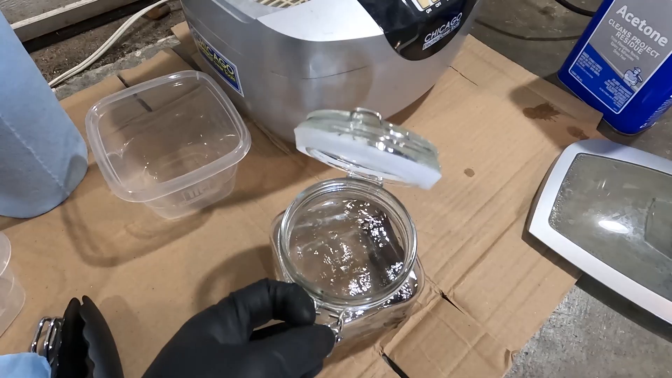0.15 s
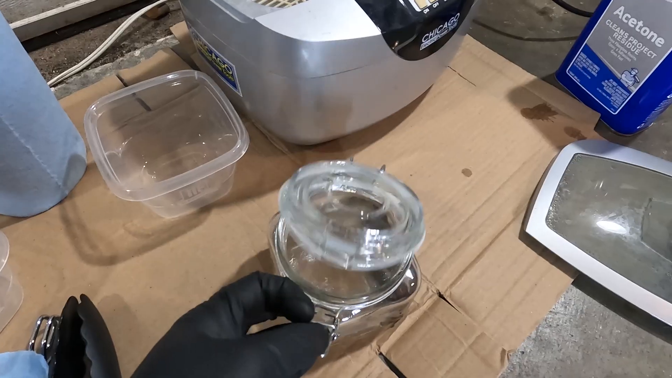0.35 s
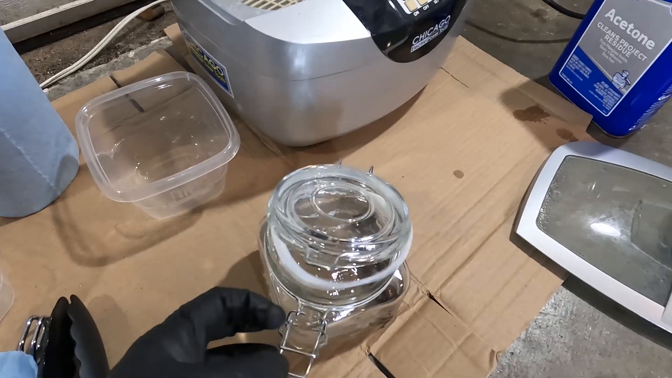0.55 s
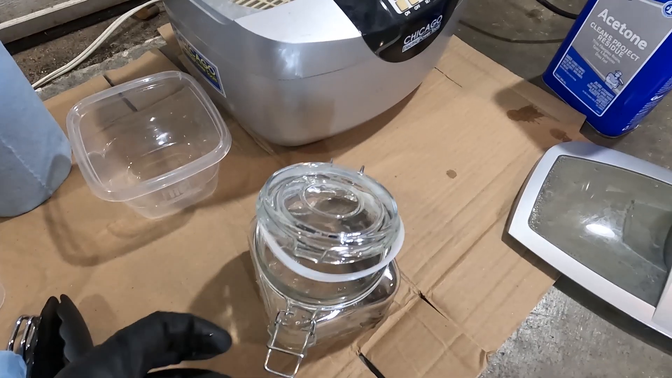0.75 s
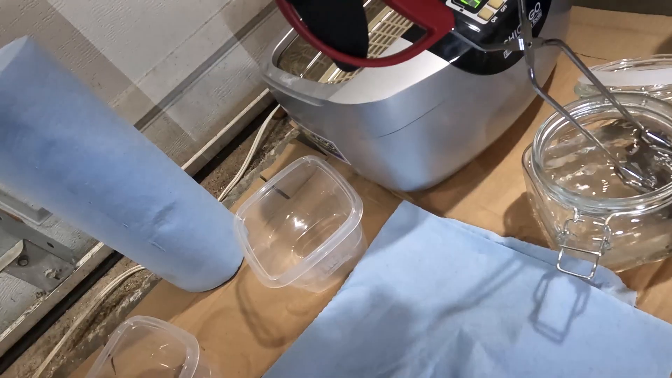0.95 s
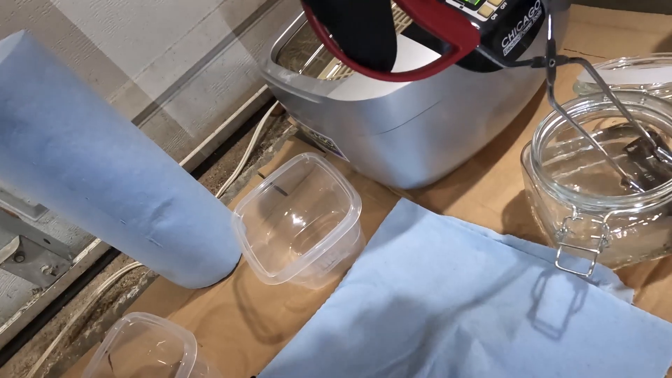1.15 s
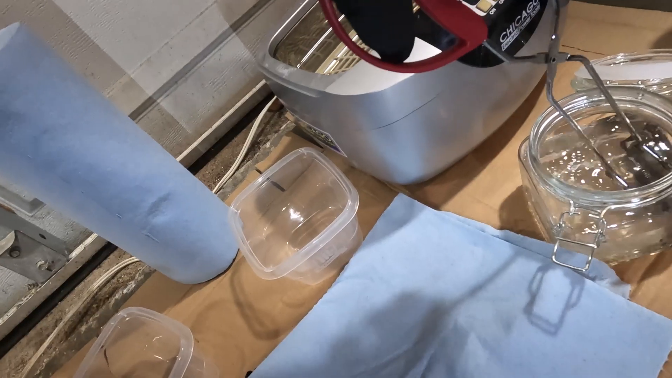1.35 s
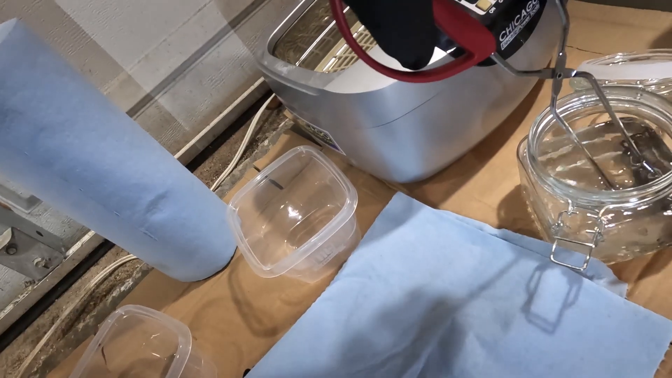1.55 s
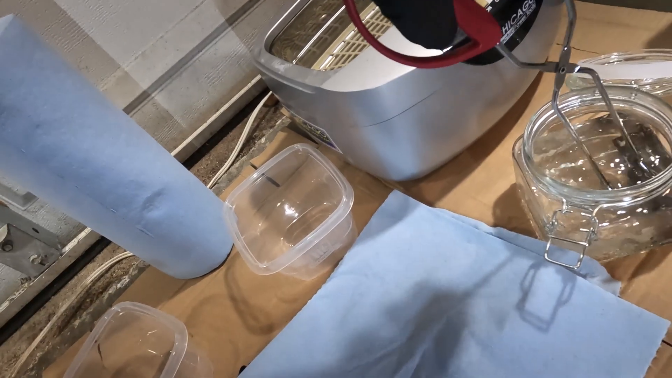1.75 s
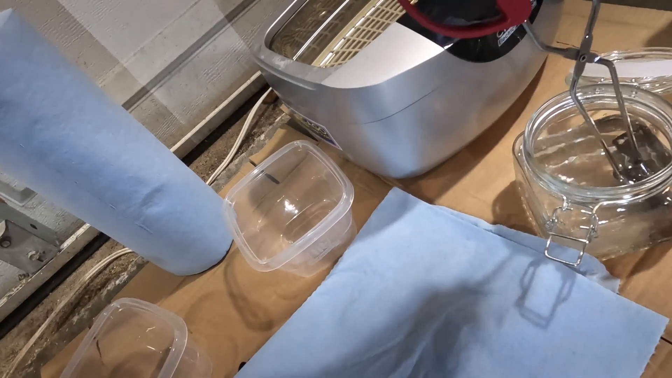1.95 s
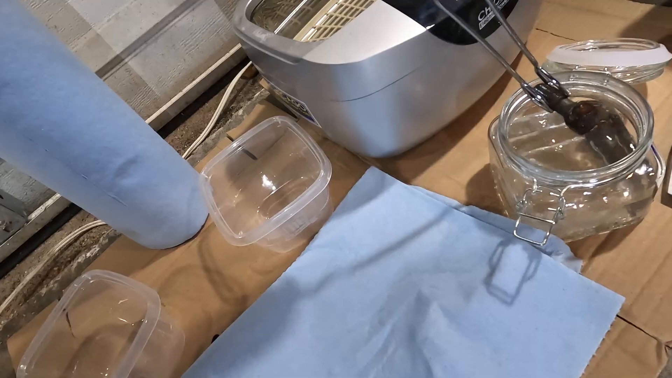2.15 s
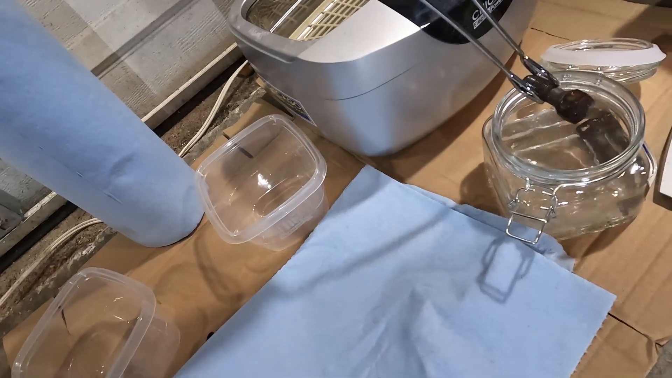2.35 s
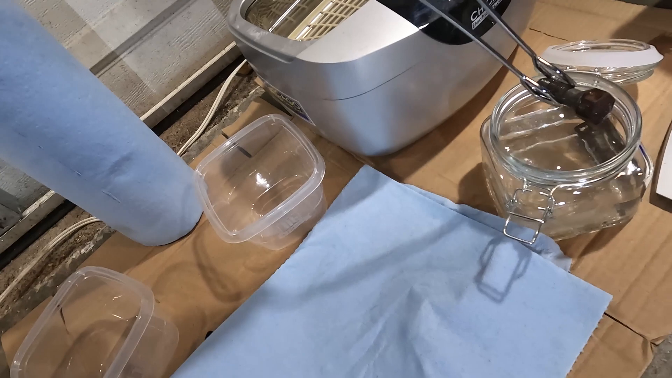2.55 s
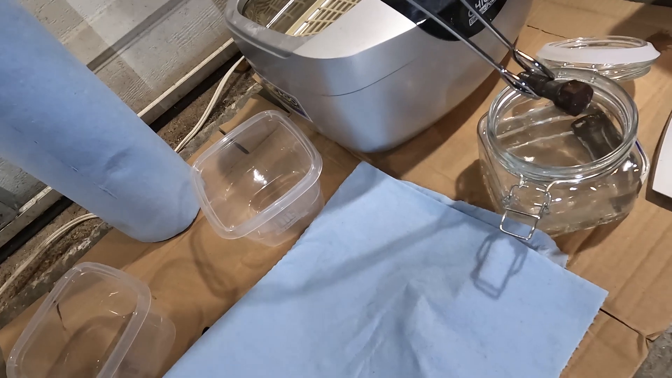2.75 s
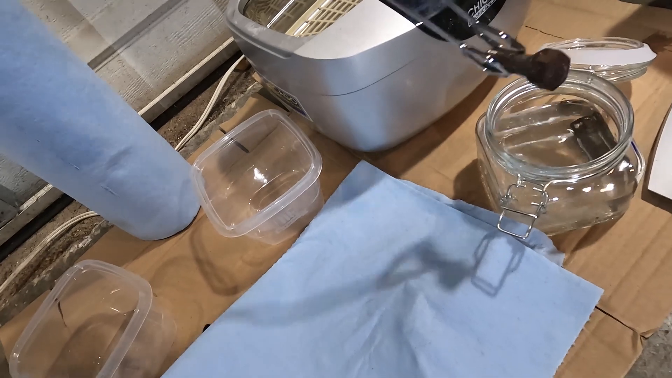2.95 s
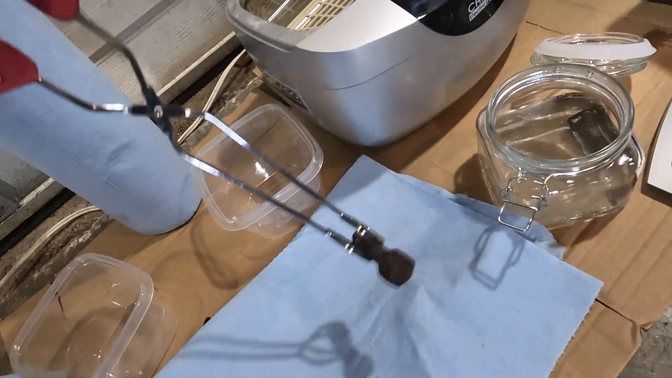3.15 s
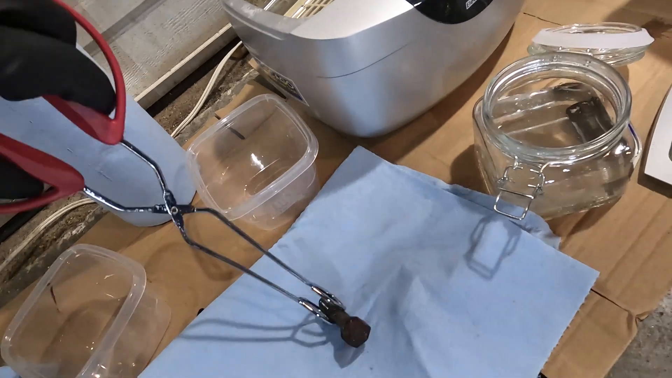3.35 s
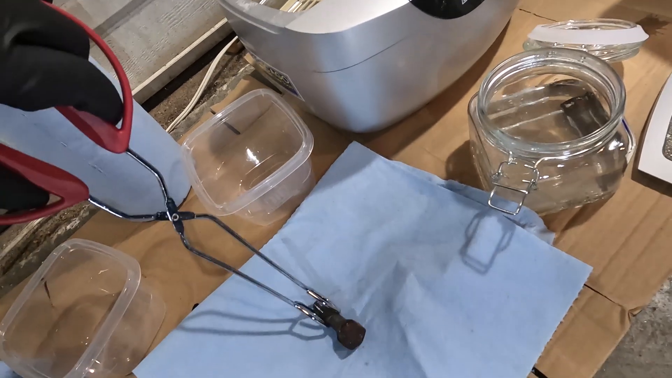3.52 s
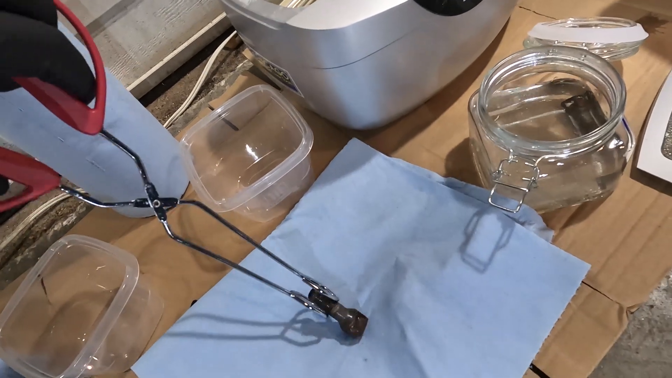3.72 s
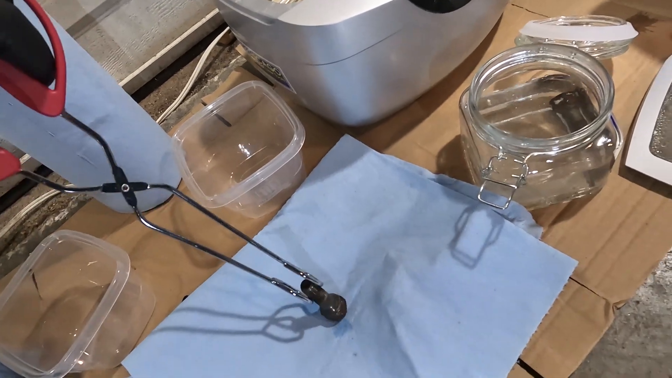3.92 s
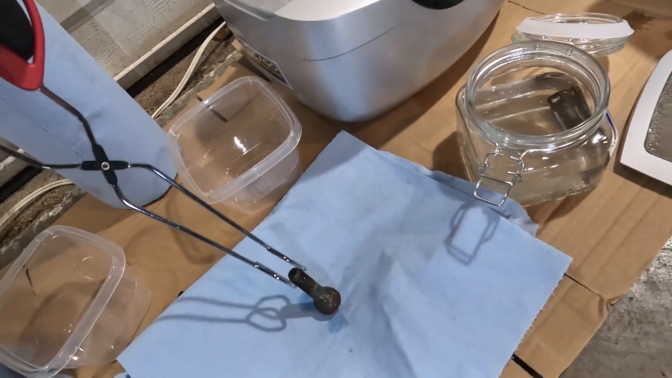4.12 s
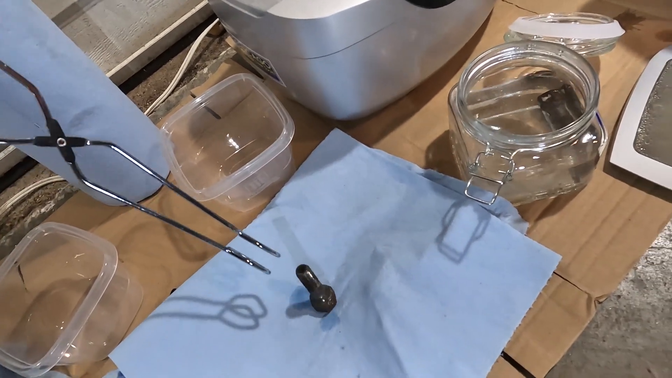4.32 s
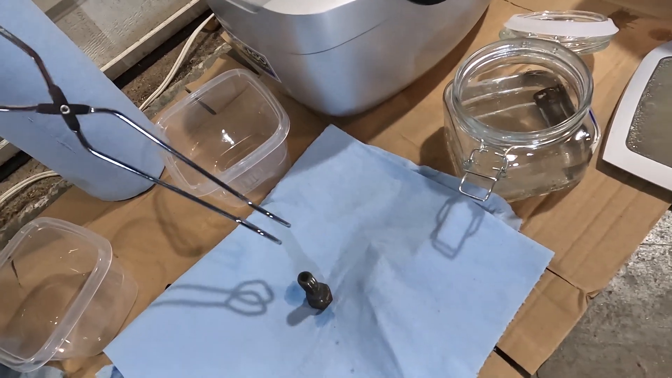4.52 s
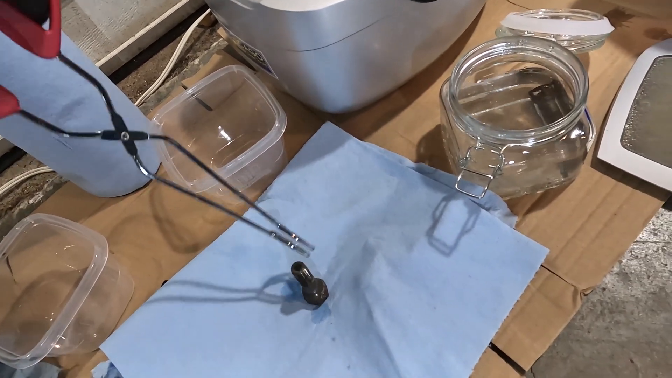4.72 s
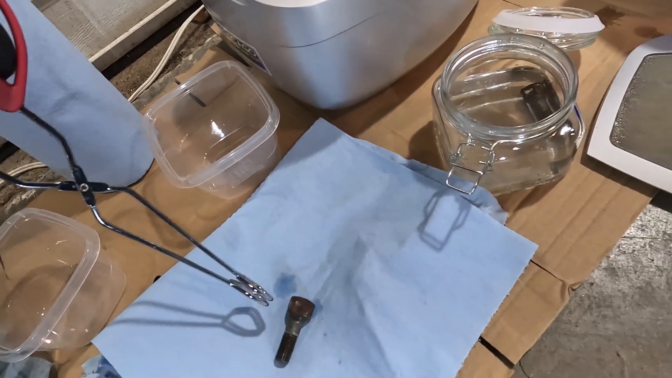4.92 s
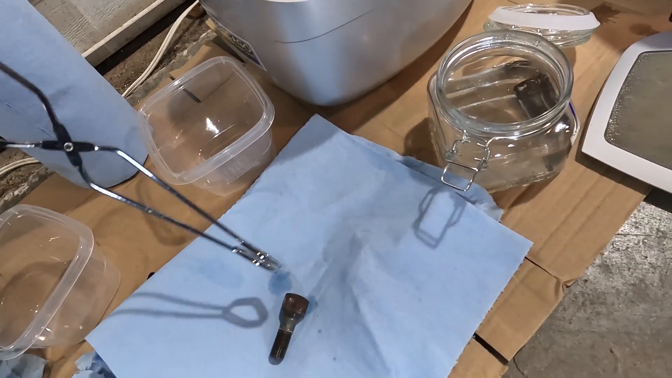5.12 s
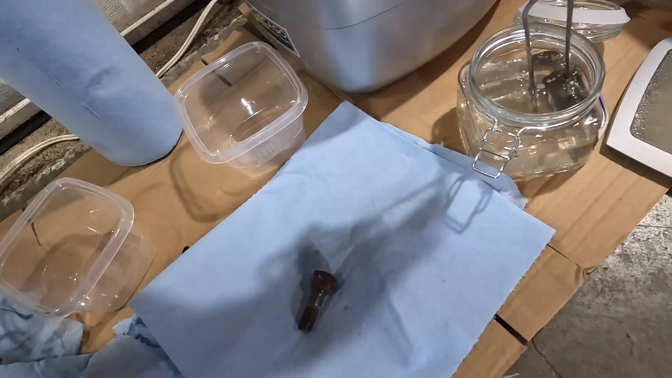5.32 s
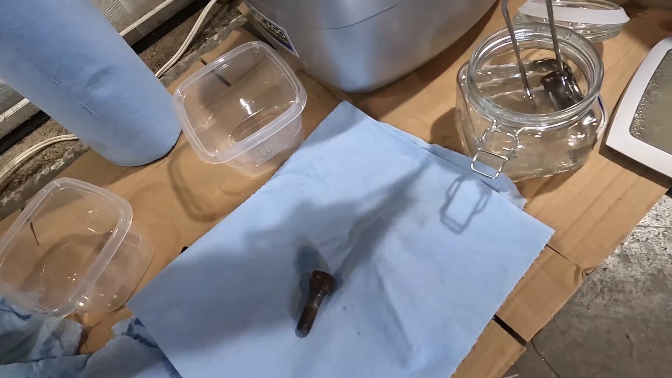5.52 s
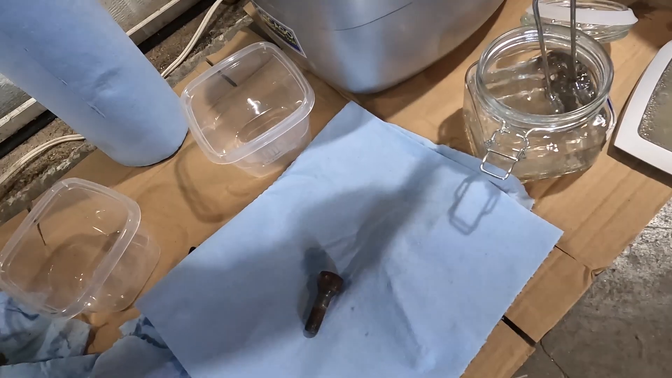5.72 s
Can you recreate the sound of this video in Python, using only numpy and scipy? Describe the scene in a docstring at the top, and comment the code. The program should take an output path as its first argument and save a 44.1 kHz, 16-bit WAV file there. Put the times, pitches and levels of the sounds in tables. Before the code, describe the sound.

A small workshop with soft bassy air noise, a steady low mains hum and faint handling rumble, heard through a close hand-held stereo microphone, slightly heavier on the right. At about 0.2 s a clip-top jar springs open: a dull bench thump, short wire twang, scrape and glass clunks, with another lid tap at 0.3 s. Light ticks and a faint hinge scrape lead to a lid clink near 0.66 s. Steel tongs tap the glass from 0.87 to 1.25 s, bright and ringing; bolts clink at 1.7 and 2.0 s, and a purer, beating rim ring sounds at 2.3 s. Then mostly hum until a faint rasp from 3.6 s, with small dry steel clicks around 3.9-4.3 s. Sharp jaw clicks come at 4.9 s and a firm bench bump at 5.1 s. From 5.4 s to the end, tongs and bolts rattle rapidly in the jar with gritty skids.

```python
"""Glass jar and steel tongs on a bench

A clip-top glass jar is popped open on a cardboard-covered bench; steel tongs fish in it, knock on the
glass and lift out a bolt. The jaws scrape off the bolt over a paper towel and click shut, something bumps
the bench, and the tongs rummage in the jar again. Blows are sums of decaying modes with bursts of noise,
scrapes are trains of stick-slip clicks; a small workshop with a mains hum surrounds a hand-held microphone."""
import sys
import numpy as np
from scipy import signal
from scipy.fft import rfft, irfft
from scipy.io import wavfile
from scipy.ndimage import uniform_filter1d

SR = 44100
rng = np.random.default_rng(int(sys.argv[2]) if len(sys.argv) > 2 else 0)


def int16_out(signal):
    """Quantize to a 16-bit WAV file."""
    q = np.round(np.clip(np.atleast_2d(signal).T, -1, 1) * 32767)
    wavfile.write(sys.argv[1], SR, q.astype(np.int16))


N = 254898
TIME = np.arange(N) / SR
AGE = TIME[:SR // 2]  # seconds since a blow


def amp(db):
    """Logarithmic level: decibels to amplitude gain."""
    return 10 ** (np.asarray(db) / 20)


def level(x, db):
    """Mean power: scale the whole signal to an rms level."""
    return x * amp(db) / np.std(x)


def attack(x, db):
    """Onset power: scale a blow by the rms level of its first 25 ms."""
    return x * amp(db) / np.std(x[:SR // 40])


def fade(t60):
    """Exponential damping: a loss of 60 dB in t60 seconds."""
    return np.exp(-np.log(1000) * AGE / max(t60, 1e-3))


def band(x, lo_hz, hi_hz, order=3):
    """Band limitation: a causal Butterworth band-pass."""
    sos = signal.butter(order, [lo_hz, min(hi_hz, SR / 2 - 1)], "band", fs=SR, output="sos")
    return signal.sosfilt(sos, x + 1e-18)


def noise(t60):
    """Broadband excitation: a burst of decaying white noise."""
    return rng.standard_normal(len(AGE)) * fade(t60)


def add(track, start_s, x):
    """Superposition: mix x into the track at its start time."""
    i = max(int(start_s * SR), 0)
    track[i:i + len(x)] += x[:max(N - i, 0)]


def through(x, response):
    """Linear response: convolve x with an impulse response of unit energy."""
    return signal.fftconvolve(x, response / np.linalg.norm(response))[:N]


def ring(modes, t60_at_4khz, scatter_db, detune, damping=0.41):
    """Modal superposition: high modes die sooner; contact spot and grip vary their levels and pitches."""
    out = np.zeros(len(AGE))
    for mode_hz, mode_db in modes:
        level_chance, pitch_chance, sign_chance = rng.standard_normal(3)
        gain = np.sign(sign_chance) * amp(mode_db + scatter_db * level_chance)
        decay = fade(t60_at_4khz * (4000 / mode_hz) ** damping)
        out += gain * decay * np.sin(2 * np.pi * mode_hz * (1 + detune * pitch_chance) * AGE)
    return out


# spectrum of the workshop air, before its overall level is set: pitch_hz, density_db (dB per Hz)
AIR_SPECTRUM = [(30, -3), (100, -6), (200, -18), (400, -37), (750, -42.5), (1300, -40), (2500, -54),
                (4500, -57.5), (7000, -53.5), (13000, -66.5)]


def workshop_air(air_db=-40.5):
    """Diffuse-field noise: shaped noise whose two ports agree in the bass and differ higher up."""
    freq = np.fft.rfftfreq(N, 1 / SR) + 1e-3
    hz, db = np.transpose(AIR_SPECTRUM)
    shape = amp(np.interp(np.log(freq), np.log(hz), db))
    mid, side = rfft(rng.standard_normal((2, N))) * shape
    side = side * np.clip(freq / 2500, .08, .8)
    return level(irfft(np.array([mid + side, mid - side]), N), air_db)


def mains_hum(hum_hz=119.5, hum_db=-45):
    """Modulated tone: a sine whose phase and level waver together at 1 to 1.5 Hz."""
    waver = level(band(rng.standard_normal(N), 1.0, 1.5, order=1), 0)
    tone = np.sin(2 * np.pi * hum_hz * TIME + 0.1 * waver)
    return level(tone * amp(0.5 * waver), hum_db)


# rumble of the hand on the microphone, interpolated between the rows: time_s, level_db
HAND_RUMBLE = [(0, -39), (3.0, -44.5), (3.4, -37), (4.4, -34), (5.78, -36)]


def hand_rumble():
    """Structure-borne sound: very low noise follows the movements of the hand."""
    rumble = level(band(rng.standard_normal(N), 26, 27, order=2), 0)
    return rumble * amp(np.interp(TIME, *np.transpose(HAND_RUMBLE)))


def workshop():
    """Background superposition: air noise, mains hum and the rumble of the hand."""
    return workshop_air() + mains_hum() + hand_rumble()


def room(x, early_db=-10, tail_db=-12, t60_low=0.25, t60_high=0.26):
    """Reverberation: bench reflections reach both ports alike, the diffuse tail differs between them."""
    sparse = rng.random(len(AGE)) < .03
    near = through(x, noise(0.11) * (AGE > .002) * sparse)
    tails = []
    for _ in range(2):
        low = band(noise(t60_low), 130, 5500, order=2)
        high = band(noise(t60_high), 5000, 9000, order=1)
        tails.append(through(x, (low + amp(-2.5) * high) * (AGE > .008)))
    return x + amp(early_db) * near + amp(tail_db) * np.array(tails)


# dull blows on the bench: start_s, level_db, thud_db (re level)
BENCH_BUMPS = [(0.176, -29.5, 14), (0.186, -31, 8), (0.226, -31.5, -0.5), (0.513, -41, 1.5),
               (0.56, -39, -6), (3.757, -55.5, 9.5), (5.077, -25.5, 2.5), (5.104, -27.5, -8)]
SLAP_PER_DB, FIRM_BUMP_DB = 0.5, -28  # a bump softer than a firm one loses its slap faster than its knock


def bumps(knock_db=-3, slap_db=-2):
    """Impact on a damped plate: the bench thuds and its cardboard cover knocks and slaps."""
    out = np.zeros(N)
    for start_s, level_db, thud_db in BENCH_BUMPS:
        boards = np.zeros(len(AGE))
        for hz, t60 in [(88, 0.054), (118, 0.061), (150, .07), (250, 0.043)]:
            boards += fade(t60) * np.sin(2 * np.pi * hz * AGE)
        thud = attack(boards, thud_db)
        knock = attack(band(noise(.13), 170, 650, order=2), knock_db)
        firmness_db = SLAP_PER_DB * (level_db - FIRM_BUMP_DB)
        slap = attack(band(noise(.12), 900, 3500, order=2), slap_db + firmness_db)
        add(out, start_s, amp(level_db) * (thud + knock + slap))
    return out


# twangs of the lid's wire clasp: start_s, pitch_hz, level_db, t60_s
CLASP_TWANGS = [(.186, 595.8, -14, 0.24), (.226, 702, -44.5, 2)]


def clasp():
    """Free vibration: the released wire clasp rings like a small spring."""
    out = np.zeros(N)
    for start_s, pitch_hz, level_db, t60_s in CLASP_TWANGS:
        add(out, start_s, amp(level_db) * fade(t60_s) * np.sin(2 * np.pi * pitch_hz * AGE))
    return out


SWELL_DB_PER_S, RELEASE_DB_PER_S = 66.5, 300  # the pressure builds through a stroke, then lets go


def pressure(strokes):
    """Sliding contact: each stroke catches at once, swells to its end and dies away."""
    gain = np.zeros(N)
    for start_s, end_s, level_db in strokes:
        swell_db = SWELL_DB_PER_S * np.maximum(end_s - TIME, 0)
        release_db = RELEASE_DB_PER_S * np.maximum(TIME - end_s, 0)
        gain += (TIME > start_s) * amp(level_db - swell_db - release_db)
    return gain


def slips(strokes, per_s, spread_db):
    """Stick-slip friction: random tiny clicks, set to unit power, follow the pressure of the strokes."""
    happens = rng.random(N) < per_s / SR
    strength = amp(spread_db * np.clip(rng.standard_normal(N), -2, 2))
    clicks = happens * strength * rng.choice([-1, 1], N)
    return level(clicks, 0) * pressure(strokes)


def rasp(strokes, response, hiss_db):
    """Friction-driven resonance: slips ring a body, and each sheds a moment of hiss."""
    clicks = slips(strokes, 1200, 4)
    envelope = np.sqrt(np.abs(uniform_filter1d(clicks ** 2, size=130)))
    hiss = envelope * rng.standard_normal(N)
    hiss = band(band(hiss, 1100, 11000, order=1), 900, 13500, order=5)
    return through(clicks, response) + amp(hiss_db) * hiss


# ringing modes of the jar's glass and of the steel on it: pitch_hz, level_db (relative)
GLASS_MODES = [(1660, -11.5), (2790, -10), (3232, -5), (3740, -3), (4185, -9.5), (4285, -5.5), (4812, -4.5),
               (5445, -1.5), (6040, -8.5), (6225, 1.5), (6570, -0.5), (7025, -1.5), (7510, -12.5),
               (10350, -2), (10500, -1), (13660, -15)]
STEEL_MODES = [(1725, -7), (2260, 0), (3450, -6), (4490, -5.5), (4900, -3), (5860, 8), (7750, 0.5),
               (8450, -5), (8750, -11), (9290, -5.5), (9640, -1)]
GLASS_T60_S, STEEL_T60_S = 0.12, 0.063  # at 4 kHz


def jar_response():
    """Modal response: the jar's glass with weaker steel, as each slip excites them."""
    return ring(GLASS_MODES, GLASS_T60_S, 0, 0) + amp(-4.0) * ring(STEEL_MODES, STEEL_T60_S, 0, 0)


# strokes of the lid grinding in its hinge: start_s, end_s, level_db (at the end, relative)
LID_STROKES = [(.185, .205, -20.5), (.5, .6, -46)]


def lid_scrape(lid_db=-3):
    """Stick-slip friction: the lid grinds in its wire hinge and excites the jar."""
    return amp(lid_db) * rasp(LID_STROKES, band(jar_response(), 2100, 4600, order=2), 1)


# strokes of the tongs round the jar: start_s, end_s, level_db (at the end, relative)
RUMMAGE_STROKES = [(5.52, 5.55, -32), (5.645, 5.78, -19)]


def rummage(rummage_db=-3):
    """Stick-slip friction: the tongs skid round the jar and excite it."""
    return amp(rummage_db) * rasp(RUMMAGE_STROKES, band(jar_response(), 1650, 5700, order=2), -5.5)


# ringing modes of the tongs' jaws: pitch_hz, level_db (relative)
JAW_MODES = [(3170, -2), (3970, -4.5), (5040, 4.5), (5350, -8.5), (5520, 4), (6260, 1.5), (6920, 4.5),
             (7900, 5), (8270, -7.5), (9300, -4), (10760, -11)]
JAWS_T60_S = .035  # at 4 kHz
# strokes of the jaws along the bolt's thread: start_s, end_s, level_db (at the end, relative)
BOLT_STROKES = [(3.6, 3.98, -40.5), (4.23, 4.29, -33)]


def bolt_scrape(bolt_db=-7):
    """Damped resonance: the jaws rasp along the bolt's thread while the grip halves their ringing."""
    return amp(bolt_db) * rasp(BOLT_STROKES, ring(JAW_MODES, JAWS_T60_S / 2, 0, 0), 8.9)


# small clicks of steel: start_s, level_db, pitch_hz (strongest partial)
STEEL_TICKS = [(0.4602, -42.5, 6500), (0.503, -47, 5920), (0.5936, -40, 4830), (0.608, -43.5, 3300),
               (2.01, -36, 6500), (2.155, -51.5, 3000), (3.926, -33.5, 6200), (3.954, -35, 5440),
               (3.9639, -32, 4700), (4.006, -34, 5500), (4.184, -45, 4980), (4.2174, -38.5, 4300),
               (4.2547, -35, 5100), (4.2677, -29.5, 6830), (4.2951, -33.5, 3170), (4.906, -31, 8400),
               (4.9316, -29, 8600), (4.9742, -45, 5180), (5.079, -33.5, 3220), (5.1055, -27.5, 7000)]


def ticks(low_db=-6.0, high_db=-2, crack_db=13, favoured_db=9):
    """Heavily damped impact: the gripped jaws give short, dry, bright clicks."""
    out = np.zeros(N)
    for start_s, level_db, pitch_hz in STEEL_TICKS:
        jaws = ring(JAW_MODES + [(pitch_hz, favoured_db)], JAWS_T60_S, 2, .012)
        blow = jaws + amp(crack_db) * noise(.012) + amp(-3) * noise(.05)
        low = attack(band(blow, 1220, 5240), low_db)
        high = attack(band(blow, 5100, 12500, order=4), high_db)
        add(out, start_s, amp(level_db) * (low + high))
    return out


REBOUND_S, REBOUND_DB = .004, -5  # typical gap before the springy steel touches again; loss per rebound


def chatter(x, count=2):
    """Repeated impact: a blow followed by its quick, ever weaker rebounds."""
    delays = np.cumsum(REBOUND_S * rng.uniform(.4, 1.6, count))
    out = x
    for k, delay_s in enumerate(delays):
        out = out + amp(REBOUND_DB * (k + 1.5)) * np.pad(x, (int(delay_s * SR), 0))[:len(x)]
    return out


RIM_HZ, RIM_SPLIT_HZ, RIM_T60_S = 2074, 5, .3
RIM_LOAD = .003  # largest share by which the touching steel detunes the rim note


def rim_note(twin_db=-8):
    """Split degenerate mode: the mouth flexes into an oval and, being not quite round, beats."""
    hz = RIM_HZ * (1 + RIM_LOAD * rng.uniform(-1, 1))
    twin = np.sin(2 * np.pi * (hz - RIM_SPLIT_HZ) * AGE)
    oval = np.sin(2 * np.pi * hz * AGE) + amp(twin_db) * twin
    # energy spreads from the contact spot round the jar, so the note swells before it fades
    swell = 1 - .7 * fade(.25)
    return oval * swell * fade(RIM_T60_S)


# what strikes the jar: body_db (shake of the jar), top_db (before brightness),
# own_hz (the striker's strongest partial)
JAR_STRIKERS = {"lid": (-18, -8.5, 7900), "tongs": (-31, -7, 5950), "bolt": (-14, -14, 4850)}
# blows on the jar: start_s, striker, level_db, bright_db, rim_db (re level, before a common trim),
# spot_hz (partial favoured by the contact spot)
JAR_BLOWS = [(0.1754, "lid", -29.5, 6.5, -7.5, 3830), (0.2294, "lid", -20, -17, -28, 3355),
             (0.3216, "lid", -29.5, -8.5, -9.5, 2717), (0.6623, "lid", -25.5, 0, -30, 2810),
             (0.8674, "tongs", -29.5, 6.5, 7, 4282), (1.051, "tongs", -23.5, 3, -1.5, 2795),
             (1.1074, "tongs", -24, 0.5, -19, 2800), (1.215, "tongs", -25, 3, -3, 2764),
             (1.252, "tongs", -26, -0.5, -8.5, 2800), (1.6966, "bolt", -26, -3, -24, 4307),
             (1.7372, "bolt", -30.5, -17, -29, 2850), (1.9795, "bolt", -29, -3.5, -12, 2740),
             (2.0177, "tongs", -28.5, 3, -18, 4860), (2.046, "bolt", -31.5, 4, -34, 2850),
             (2.289, "bolt", -21.5, -10.5, 8, 2800), (5.3866, "bolt", -21, -2, -28, 2260),
             (5.4749, "bolt", -22, -2, -18, 1696), (5.5, "bolt", -26, -16, -14, 2215),
             (5.555, "bolt", -29, 1, -19, 2220), (5.5741, "bolt", -21, -0.5, -34, 3230),
             (5.6404, "bolt", -24, 4.5, -9.5, 3220), (5.6717, "bolt", -26, 1, -16, 3430),
             (5.7202, "bolt", -26.5, 4.5, -12, 5360), (5.7515, "bolt", -25.5, 5.5, -11, 4330)]
PURITY_PER_RIM_DB = 0.47  # the more freely the rim rings, the less a blow clatters


def clinks(rim_trim_db=-1.5, low_db=-1, high_db=-2, favoured_db=8, own_db=7, crack_db=9.5,
           wash_t60=0.1, top_t60=.25):
    """Impact excitation: a crack rings jar and steel; striker and hardness balance the registers."""
    out = np.zeros(N)
    for start_s, striker, level_db, bright_db, rim_db, spot_hz in JAR_BLOWS:
        body_db, top_db, own_hz = JAR_STRIKERS[striker]
        modes = ring(GLASS_MODES, GLASS_T60_S, 2.7, 0.0012) + ring(STEEL_MODES, STEEL_T60_S, 0.71, 0.005)
        spot = ring([(spot_hz, favoured_db)], .11, 0, 0)
        # a soft contact hardly wakes the striker's own high partial
        own = ring([(own_hz, own_db + min(bright_db, 0))], .11, 0, .015)
        # many weak modes change with every grip
        weak = ring([(hz, -7) for hz in rng.uniform(1500, 14000, size=40)], 0.16, 2, 0)
        clatter = weak + amp(crack_db) * noise(0.012) + noise(wash_t60)
        # a free blow on the rim rings purer than a jostle among the bolts
        purity_db = PURITY_PER_RIM_DB * max(rim_db + 13, 0)
        blow = modes + spot + own + amp(-purity_db) * chatter(clatter)
        body = attack(band(noise(0.15), 260, 1600, order=2), body_db)
        low = attack(band(blow, 1450, 4600), low_db)
        high = attack(band(blow, 4500, 8500, order=4), high_db + bright_db)
        top = attack(band(blow, 8500, 13600, order=4) * fade(top_t60), top_db + bright_db)
        add(out, start_s, amp(level_db) * (body + low + high + top))
        add(out, start_s, attack(rim_note(), level_db + rim_db + rim_trim_db))
    return out


def scene():
    """Superposition: all the handling on the bench, reverberated in the workshop."""
    scrapes = lid_scrape() + rummage() + bolt_scrape()
    handling = clinks() + ticks() + scrapes + bumps() + clasp()
    return room(handling) + workshop()


# balance of the two microphone ports: pitch_hz, left_minus_right_db
PORT_BALANCE = [(100, -4), (6000, -5.2), (9000, -3), (12000, 2)]
PORT_LAG_SAMPLES, TOP_HZ = .8, 15600


def record(dry):
    """Interaural-style cues: the left port is quieter except in the top and lags; the top is cut."""
    freq = np.fft.rfftfreq(N, 1 / SR)
    tilt_db = np.interp(freq, *np.transpose(PORT_BALANCE))
    lag = np.exp(-2j * np.pi * freq * PORT_LAG_SAMPLES / SR)
    ports = np.array([amp(tilt_db / 2) * lag, amp(-tilt_db / 2)])
    heard = np.clip(irfft(rfft(dry) * ports, N), -1, 1)
    return signal.sosfilt(signal.ellip(8, .2, 70, TOP_HZ, fs=SR, output="sos"), heard)


dry = scene()
out = record(dry)
int16_out(out)
```